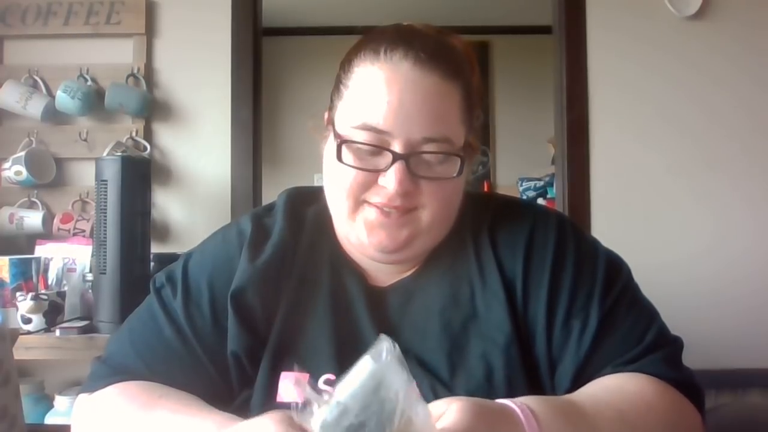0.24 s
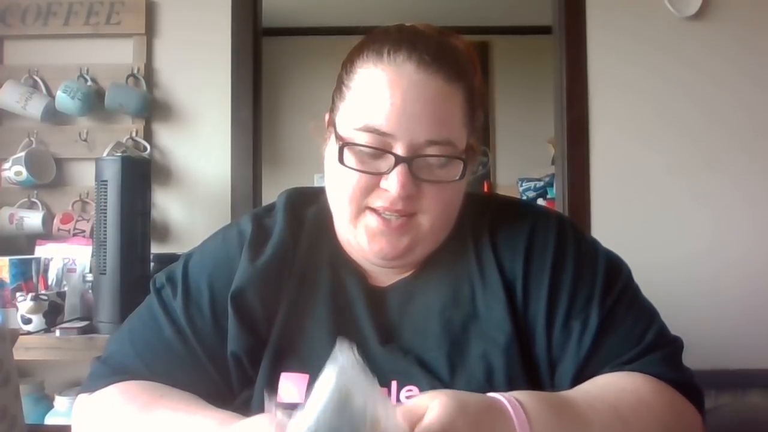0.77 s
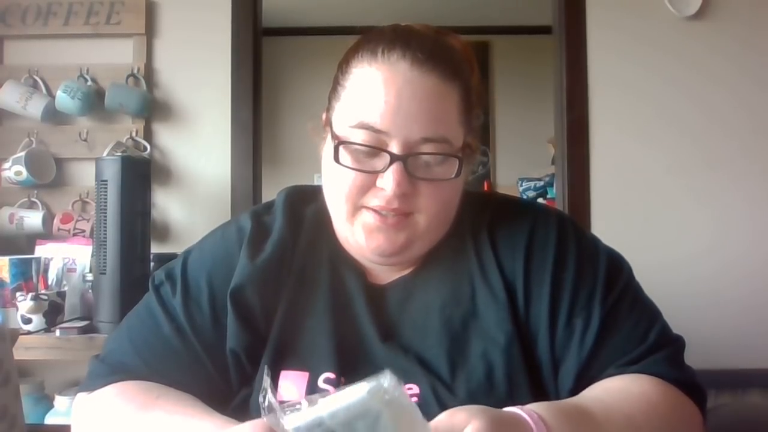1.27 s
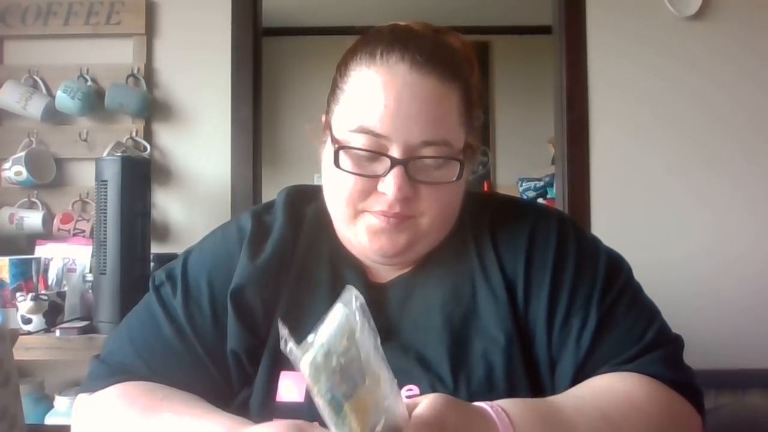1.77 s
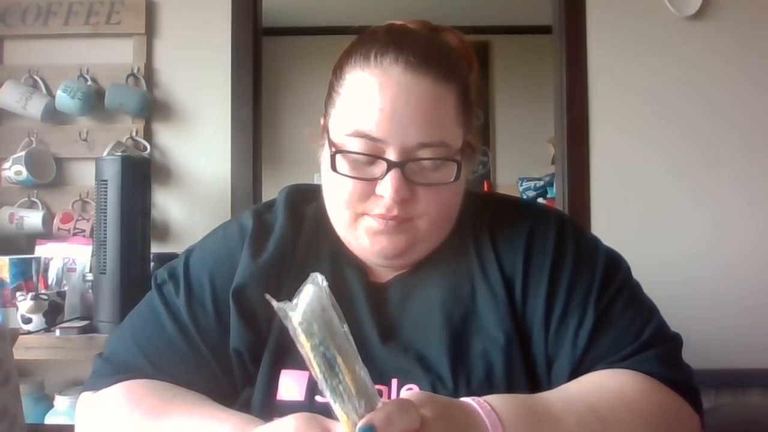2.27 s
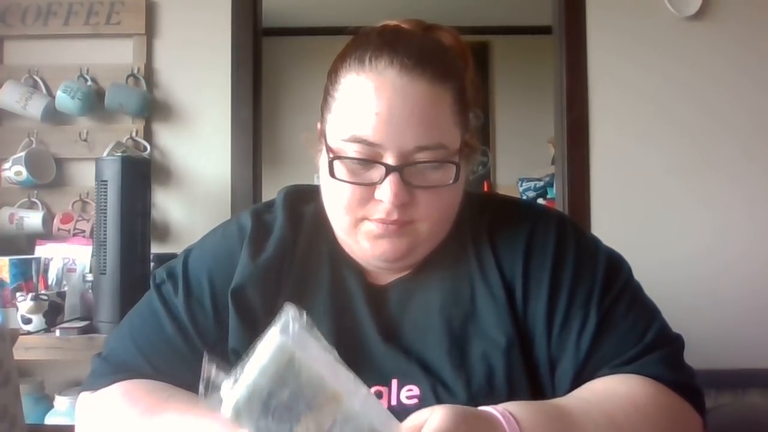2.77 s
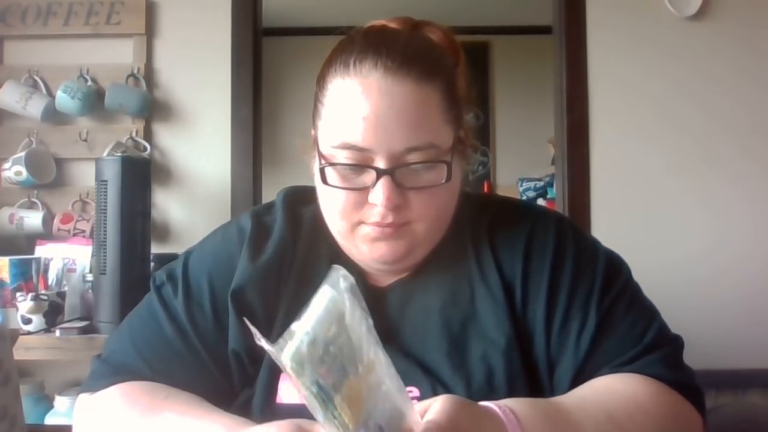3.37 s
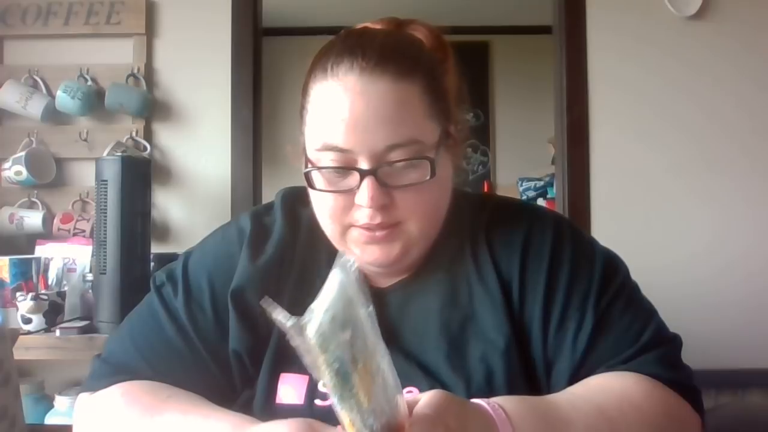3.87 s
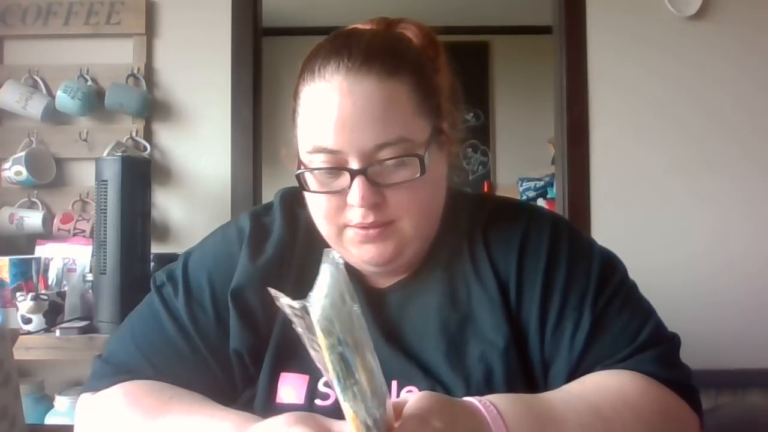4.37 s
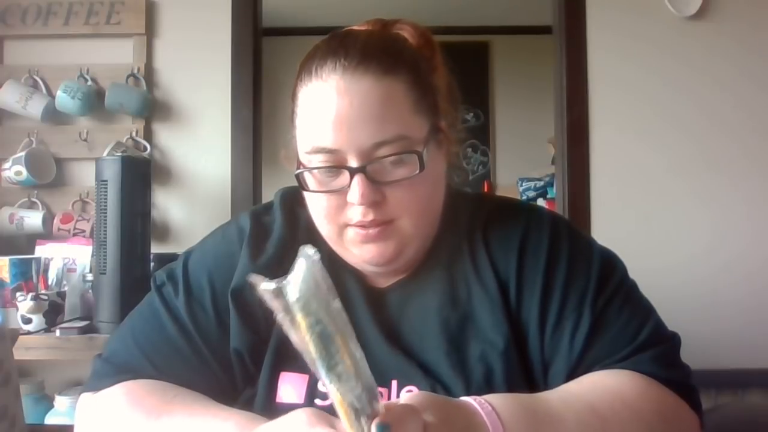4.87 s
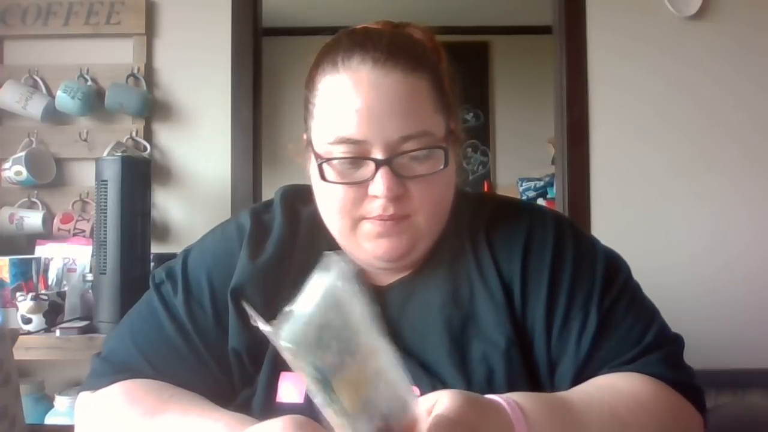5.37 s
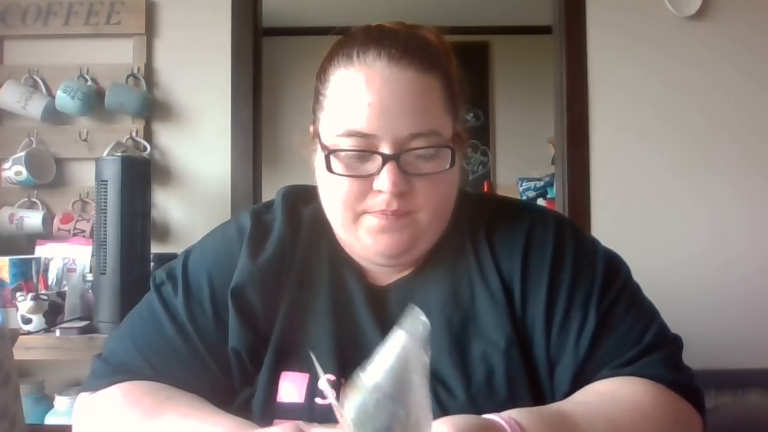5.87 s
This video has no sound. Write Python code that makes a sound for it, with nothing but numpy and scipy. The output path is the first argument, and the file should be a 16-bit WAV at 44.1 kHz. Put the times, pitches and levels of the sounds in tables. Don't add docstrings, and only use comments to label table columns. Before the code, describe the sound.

Close plastic crinkling, bright but narrow in band, as though through a laptop microphone with noise suppression. Sharp creases pop over fine crackle while the packet knocks dully underneath. Activity rises and falls: several early flurries, a strongest cluster around the middle, one isolated hard snap later, then fuller rustling to the end. Pauses drop almost to silence, with little room echo.

```python
import sys
import numpy as np
from scipy import signal
from scipy.fft import rfft, irfft, next_fast_len
from scipy.io import wavfile
from scipy.ndimage import uniform_filter1d

SR = 44100
rng = np.random.default_rng(int(sys.argv[2]) if len(sys.argv) > 2 else 0)


def magnitude_from_level(level_db):
    exponent = np.asarray(level_db, float) / 20
    return 10 ** exponent


def put_to_file(sound):
    columns = np.atleast_2d(sound).T
    safe = np.clip(columns, -1, 1)
    whole_steps = np.round(safe * 32767)
    wavfile.write(sys.argv[1], SR, whole_steps.astype(np.int16))


N = 270774


def at_hz(points, hz):
    points = np.array(points)
    return np.interp(np.log(hz + 1), np.log(points[:, 0]), points[:, 1])


def shape(x, gain):
    size = next_fast_len(len(x) + SR // 8)
    hz = np.arange(size // 2 + 1) * SR / size
    return irfft(rfft(x, size) * gain(hz), size)[:len(x)]


def resonance(x, hz, width_hz):
    r = np.exp(-np.pi * width_hz / SR)
    top = [(1 - r * r) / 2, 0, (r * r - 1) / 2]
    return signal.lfilter(top, [1, -2 * r * np.cos(2 * np.pi * hz / SR), r * r], x + 1e-18)


def rms_one(x):
    return x / np.sqrt(np.mean(x ** 2) + 1e-20)


def drift(rate):
    r = np.exp(-2 * np.pi * rate / SR)
    settled = signal.lfilter([1], [1, -2 * r, r * r], rng.standard_normal(N + SR))[SR:]
    return rms_one(settled)


# [pitch_hz, level_db per Hz]
FILM = [
    (100, -26.5),
    (300, -15.5),
    (700, -6),
    (1200, -2.5),
    (2500, 0),
    (4500, 0.5),
    (6500, 0.5),
    (9500, -12),
]


def film_colour(x):
    return shape(x, lambda hz: magnitude_from_level(at_hz(FILM, hz)))


def hiss():
    return magnitude_from_level(-78.5) * film_colour(rng.standard_normal(N))


# [pitch_hz, time to fall 60 dB in s]
ROOM = [
    (300, 0.087),
    (800, 0.13),
    (2000, 0.23),
    (5500, 0.028),
]


def room(x, places=7):
    t, edges_hz = np.arange(SR // 3) / SR, 100 * 2. ** np.arange(8)
    place = np.arange(N) / SR / 0.06
    out = 0
    for k in range(places):
        tail = 0
        for low, high in zip(edges_hz, edges_hz[1:]):
            octave = signal.butter(2, [low, high], "band", fs=SR, output="sos")
            band = signal.sosfilt(octave, rng.standard_normal(len(t)))
            tail = tail + band * magnitude_from_level(-60 * t / at_hz(ROOM, 1.0 * low))
        tail = tail * np.clip((t - 0.002) / 0.00038, 0, 1)
        here = np.sin(np.pi / 2 * np.clip((place - k) % places, 0, 2))
        out = out + signal.fftconvolve(x * here, tail / np.sqrt(np.sum(tail ** 2)))[:N]
    return out


SWAY_DB = 4
# [pitch_hz, width_hz, level_db]
PACKET = [
    (127, 65, -10),
    (229.5, 20, -8),
    (450.6, 107, 7),
    (617, 94, 6),
    (943, 120, -6.5),
]


def packet(pushes, sway_db):
    out = 0
    for (hz, width_hz, db), sway in zip(PACKET, sway_db):
        out = out + magnitude_from_level(db + sway) * resonance(pushes, hz, width_hz)
    return out


def flex(x):
    t = np.arange(SR // 40) / SR / 0.01
    swell = (t * np.exp(-3.0 * t)) ** 2
    power = signal.fftconvolve(x ** 2, swell / swell.sum())[:N]
    return rng.standard_normal(N) * np.sqrt(np.maximum(power, 0))


# [start_s, peak level_db, pitch_hz]
KNOCKS = [(0.159, -26.5, 714), (0.654, -38.5, 476), (0.961, -35.5, 670), (1.044, -38, 616),
          (1.116, -27.5, 620), (1.168, -27, 605), (1.454, -26.5, 623), (2.214, -37, 430),
          (2.912, -28.5, 590), (2.936, -27, 613), (2.99, -23, 620), (3.482, -41, 466), (3.518, -33, 630),
          (3.722, -32, 503), (3.76, -35, 800), (1.315, -31, 1450), (4.743, -37, 460), (3.957, -39, 460),
          (4.137, -40, 640), (4.275, -41.5, 626), (4.377, -35, 660), (4.48, -34, 600), (4.616, -42.5, 504),
          (4.877, -30, 630), (4.937, -28.5, 690), (5.18, -29.5, 630), (2.947, -23, 1050),
          (5.346, -31, 1110), (1.165, -35, 1290), (1.337, -33.5, 1530), (5.426, -22.5, 590),
          (5.458, -29, 443), (5.76, -37, 664), (5.973, -39.5, 656), (6.096, -31, 460)]
# [start_s, peak level_db, pitch_hz]
THUDS = [
    (2.715, -45.5, 167),
    (2.719, -43, 276),
    (5.437, -45, 215),
    (5.465, -42, 169),
    (5.611, -45.5, 246),
]
# [start_s, peak level_db, pitch_hz]
NUDGES = [(0.279, -48, 540), (0.385, -56, 686), (0.531, -37.5, 448), (0.723, -39.5, 625), (0.844, -37, 458),
          (1.006, -39, 694), (1.317, -43, 640), (1.386, -49, 610), (1.414, -38.5, 420), (1.536, -39, 656),
          (2.117, -54.5, 620), (2.452, -38.5, 440), (2.587, -46, 659), (2.62, -40.5, 624),
          (2.669, -39, 630), (2.836, -38, 426), (3.1, -38.5, 413), (3.183, -31, 390), (3.234, -29.5, 440),
          (3.543, -39.5, 640), (3.761, -36, 640), (4.545, -36.5, 420), (4.904, -31.5, 620),
          (5.049, -35, 630), (5.209, -34, 630), (5.268, -34.5, 640), (5.373, -39, 614), (5.398, -28, 620),
          (5.807, -35.5, 634), (3.731, -33, 525), (4.823, -37, 600), (5.485, -42.5, 494), (1.19, -38, 910)]


def knocks():
    out, t = np.zeros(N + 2000), np.arange(2000) / SR
    flexes = KNOCKS + THUDS + NUDGES
    for (s, db, hz), noise in zip(flexes, rng.standard_normal((len(flexes), 2000 + len(PACKET)))):
        push = noise[:2000] * (1 - np.exp(-t / 0.0028)) * np.exp(-t / 0.0032)
        bump = resonance(resonance(push, hz, 0.31 * hz + 50), hz, 0.22 * hz + 90)
        if 350 < hz < 1000:
            bump = bump + 0.31 * packet(push, SWAY_DB * noise[2000:])
        at = int(s * SR)
        out[at:at + 2000] += magnitude_from_level(db + 9) * bump / np.abs(bump).max()
    return out[:N]


# [hardest press start_s, crackle level_db, build_up_s, release_s]
SQUEEZES = [(0.018, -46.5, 0.6, 0.034), (0.191, -38, 0.18, 0.12), (.43, -54, 0.18, 0.14),
            (.54, -49.5, 0.15, 0.061), (.72, -55, 0.031, 0.89), (0.871, -43, 0.62, 0.12),
            (1.056, -38.5, 0.38, 0.53), (1.375, -42.5, 0.015, 0.19), (1.487, -37, 0.2, 0.038),
            (1.666, -47, 0.38, 0.11), (1.85, -47, 1, 0.12), (1.986, -41.5, 0.094, 0.029),
            (2.129, -50.5, 0.073, 0.017), (2.26, -56.5, 0.035, .1), (2.5, -47.5, 0.32, 0.16),
            (2.661, -37, 0.23, 0.13), (2.87, -42, 0.3, 0.079), (2.948, -25, 0.066, 0.087),
            (3.242, -36, 0.22, 0.12), (3.56, -47.5, 0.39, 0.32), (3.734, -45.5, 0.65, 0.13),
            (3.841, -55.5, .055, 0.082), (3.977, -45.5, 0.015, 0.15), (4.397, -49, 0.039, 0.12),
            (4.566, -46, 0.051, 0.25), (4.88, -48.5, 0.3, 0.45), (5.15, -40.5, 0.09, 0.89),
            (5.352, -30, 0.046, 0.23), (5.8, -38, 0.23, 0.19), (6.121, -40, 0.093, 0.19)]


def grip(t):
    s, db, build, release = np.transpose(SQUEEZES)[:, :, None]
    away = np.maximum((s - t) / build, (t - s) / release)
    fall_db, rest_db = 21.5, -98
    return 10 * np.log10(np.sum(magnitude_from_level(db - fall_db * away) ** 2, axis=0) + magnitude_from_level(rest_db) ** 2)


def crackle():
    sizes = magnitude_from_level(4.2 * np.minimum(rng.exponential(1, N), 3)) * rng.choice([-1, 1], N)
    born = rng.random(N) < 1700 * magnitude_from_level(5.5 * drift(40)) / SR
    slips = sizes * born
    facets_hz, dealt = np.geomspace(900, 8500, 20), rng.integers(0, 20, N)
    rings = 0
    for k, hz in enumerate(facets_hz):
        patch = magnitude_from_level(3.5 * drift(4.8))
        rings = rings + patch * resonance(slips * (dealt == k), hz, 0.081 * hz)
    coarse = np.arange(0, N, 40)
    db = np.interp(np.arange(N), coarse, grip(coarse / SR))
    return magnitude_from_level(db + 12.0) * rms_one(rings + 0.27 * slips)


# [start_s, peak level_db]
LESSER = [(0.042, -31.0), (0.0608, -33.5), (0.0692, -29.5), (0.0971, -21.0), (0.1286, -31),
          (0.1537, -29), (0.2245, -27.0), (0.3293, -28.0), (0.349, -32.5), (0.3981, -27.5),
          (0.4042, -32.0), (0.4113, -32.5), (0.438, -29.5), (0.4472, -29.0), (0.4593, -30.0),
          (0.4795, -31.5), (0.4832, -30.5), (0.49, -33.5), (0.5313, -31.5), (0.5462, -30.0),
          (0.5546, -31.5), (0.5768, -30.5), (0.6141, -30), (0.6228, -38.0), (0.6652, -31.0),
          (0.6996, -30.0), (0.7239, -31.0), (0.7521, -28.0), (0.792, -34.0), (0.7973, -31.0),
          (0.8692, -27.5), (0.872, -29.0), (0.9515, -27.0), (1.0228, -25.5), (1.1025, -24.5),
          (1.1434, -27.0), (1.233, -28.5), (1.2387, -23.0), (1.2793, -31.5), (1.2956, -29.5),
          (1.3892, -27.0), (1.5219, -26.0), (1.539, -26.0), (1.6188, -28.0), (1.6267, -28.5),
          (1.6366, -27.5), (1.6467, -28.5), (1.6888, -28.5), (1.698, -27.0), (1.7626, -28.5),
          (1.7762, -29.0), (1.8012, -32.0), (1.8154, -31.0), (1.8438, -29.0), (1.8697, -32.0),
          (1.9463, -33.5), (1.9822, -28.5), (1.9874, -26.5), (1.9952, -28.0), (2.0089, -35.5),
          (2.0927, -32.0), (2.0994, -34.0), (2.1317, -27.5), (2.2176, -26.5), (2.234, -33.5),
                 (2.2994, -36.0), (2.3054, -31.5), (2.3151, -38.5), (2.3555, -28.5), (2.3605, -30.5),
                 (2.3748, -30.0), (2.3858, -33.0), (2.3895, -27.0), (2.4058, -33.0), (2.4166, -32.0),
                 (2.4303, -28.0), (2.4534, -27.0), (2.4615, -31.5), (2.4679, -29.5), (2.5093, -26.5),
                 (2.5144, -28.0), (2.5378, -27.5), (2.6039, -27.5), (2.6261, -25.5), (2.6419, -26.0),
                 (2.6658, -24.0), (2.7074, -27.0), (2.776, -30.5), (2.7942, -26.5), (2.811, -26.5),
                 (2.835, -26.5), (2.8761, -24.5), (3.0683, -26.0), (3.0906, -31.5), (3.2222, -23.5),
                 (3.2603, -25.0), (3.2845, -26.5), (3.3703, -28.5), (3.3886, -30.0), (3.409, -26.0),
                 (3.4223, -27.5), (3.4568, -35.5), (3.4633, -32.5), (3.5012, -29.5), (3.5202, -27.0),
                 (3.545, -27.0), (3.5518, -27.5), (3.586, -29.0), (3.5999, -28.0), (3.6132, -28.5),
                 (3.6237, -32.5), (3.667, -27.5), (3.7314, -26.5), (3.8267, -30.0), (3.8361, -35.0),
                 (3.8502, -36.0), (3.92, -28.0), (3.9888, -29.0), (4.0109, -26.5), (4.015, -29.0),
          (4.0975, -28.5), (4.1387, -33), (4.1444, -34), (4.1889, -32.0), (4.237, -30),
               (4.2775, -29.5), (4.2871, -29.0), (4.3029, -32.5), (4.3101, -31.5), (4.3209, -34.0),
               (4.3381, -36.0), (4.3721, -35.5), (4.3791, -27.5), (4.3837, -26.5), (4.4029, -29.0),
               (4.4874, -30.5), (4.5107, -34), (4.5264, -33.5), (4.5564, -29.0), (4.6196, -32.5),
               (4.6317, -25.0), (4.701, -33.0), (4.7309, -31.0), (4.7384, -32.5), (4.7499, -31.0),
               (4.7586, -34.0), (4.7869, -31.0), (4.8006, -27.5), (4.8388, -30.5), (4.8926, -27.0),
               (4.9018, -26.5), (4.9656, -29.0), (4.976, -28.5), (5.0374, -28.0), (5.1018, -28.5),
               (5.1429, -28.0), (5.1581, -29.0), (5.1634, -28.0), (5.2507, -29.5), (5.2646, -26.5),
               (5.3192, -26.5), (5.4862, -28.0), (5.5258, -30.0), (5.5379, -30.5), (5.5438, -30.5),
               (5.5513, -31.5), (5.5921, -24.0), (5.5957, -27.5), (5.614, -32.5), (5.6317, -36.5),
               (5.6775, -26), (5.6925, -28.5), (5.7178, -26.5), (5.7441, -26.0), (5.7725, -23.5),
               (5.8067, -25.5), (5.9762, -26.5), (6.0185, -30), (6.0229, -28.0), (6.099, -21)]


def small_creases():
    rows = LESSER
    return [(s, db - 1.1, rng.uniform(2240, 6530)) for s, db in rows]


# [start_s, peak level_db, facet pitch_hz]
ROLLING = [(0.1337, -19.0, 4690.0), (0.1617, -10.5, 4180.0), (0.1661, -18.0, 4440.0),
           (0.1768, -28.0, 4440.0), (0.1879, -17.0, 2710.0), (0.1939, -15.5, 3320.0),
           (0.1996, -21.0, 6370.0), (0.2039, -20.0, 3920.0), (0.2099, -23.0, 6760.0),
           (0.2889, -25.0, 2410.0), (0.3861, -20.5, 6460.0), (0.5032, -23.0, 5040.0),
           (0.5212, -26.5, 4010.0), (0.7339, -27.5, 3400.0), (0.8082, -25.0, 4520.0),
           (0.8163, -24.5, 5170.0), (0.8363, -26.5, 1810.0), (0.8443, -25.5, 3100.0),
           (0.8857, -23.5, 4180.0), (0.9795, -22.0, 4050.0), (0.9976, -26.5, 5560.0),
           (1.0051, -25.5, 4260.0), (1.0179, -25.5, 4650.0), (1.0375, -19.0, 5210.0),
           (1.0426, -26.0, 5680.0), (1.0485, -15.5, 4780.0), (1.0654, -19.0, 4050.0),
           (1.0863, -16.0, 6290.0), (1.0914, -24.0, 4820.0), (1.1129, -27.0, 5730.0),
           (1.1345, -24.0, 5680.0), (1.1621, -20.5, 4820.0), (1.1696, -18.0, 1030.0),
           (1.1725, -19.5, 1810.0), (1.1918, -20.0, 4650.0), (1.1983, -25.5, 1810.0),
           (1.3095, -23.0, 6420.0), (1.3176, -14.5, 1420.0), (1.3267, -15.0, 3270.0),
           (1.3813, -20.5, 2840.0), (1.4238, -23.5, 5300.0), (1.4396, -22.0, 5680.0),
           (1.4546, -14.5, 5300.0), (1.4572, -13.0, 2760.0), (1.478, -19.5, 4650.0),
           (1.4817, -13.0, 3530.0), (1.4897, -23.5, 4130.0), (1.4949, -20.0, 4650.0),
           (1.5056, -22.0, 4610.0), (1.5311, -27.0, 3060.0), (1.5431, -25.5, 5340.0),
           (1.5618, -27.0, 5340.0), (1.6594, -19.0, 3140.0)]
# [start_s, peak level_db, facet pitch_hz]
FLIPPING = [(1.7095, -23.0, 2410.0), (1.861, -22.5, 5680.0), (1.9065, -23.0, 5080.0),
            (1.9558, -27.0, 4740.0), (2.0561, -26.0, 3700.0), (2.1178, -23.5, 2370.0),
            (2.2811, -27.0, 6200.0), (2.3973, -25.5, 6370.0), (2.421, -27.0, 3230.0),
            (2.4794, -25.0, 3830.0), (2.4857, -24.5, 5300.0), (2.5, -21.5, 4690.0), (2.5049, -25.5, 5430.0),
            (2.531, -26.5, 4690.0), (2.5523, -25.0, 2410.0), (2.569, -20.5, 4610.0),
            (2.5757, -26.0, 4180.0), (2.5821, -25.0, 4130.0), (2.6098, -21.0, 4050.0),
            (2.6508, -22.5, 6630.0), (2.6696, -23.5, 6550.0), (2.6772, -26.0, 3960.0),
            (2.6946, -24.5, 5510.0), (2.7841, -20.5, 5510.0), (2.8081, -29.0, 5000.0),
            (2.8301, -20.0, 5560.0), (2.8647, -17.0, 5560.0), (2.8831, -21.0, 1810.0),
            (2.9105, -17.5, 3100.0), (2.9154, -20.5, 4220.0), (2.9183, -9.0, 3400.0),
            (2.9292, -14.5, 4910.0), (2.9318, -15.0, 3100.0), (2.9383, -11.0, 2710.0),
            (2.9429, -17.0, 3230.0), (2.948, -9.0, 4130.0), (2.9549, -15.5, 2970.0),
            (2.9614, -14.0, 6030.0), (2.9786, -20.5, 6590.0), (2.9843, -21.5, 3570.0),
            (2.9928, -17.0, 2540.0), (3.1256, -26.5, 2200.0), (3.1398, -20.0, 6890.0),
            (3.1635, -15.5, 4650.0), (3.1673, -28.0, 6290.0), (3.1849, -17.0, 2540.0),
            (3.1957, -20.5, 4780.0), (3.1983, -16.0, 5560.0), (3.2112, -23.5, 5470.0),
            (3.2451, -17.5, 4130.0), (3.2654, -24.5, 5080.0), (3.2738, -24.0, 2540.0)]
# [start_s, peak level_db, facet pitch_hz]
PICKING = [(3.315, -21.5, 5640.0), (3.4319, -26.0, 3700.0), (3.4857, -21.0, 4650.0), (3.516, -24.5, 4650.0),
           (3.5477, -25.5, 4910.0), (3.5666, -26.5, 3270.0), (3.5725, -26.5, 5380.0),
           (3.6462, -27.0, 5470.0), (3.6599, -24.5, 3140.0), (3.7174, -18.0, 4610.0),
           (3.7235, -18.0, 6420.0), (3.9308, -28.5, 5300.0), (3.9565, -24.5, 2630.0),
           (4.0869, -25.0, 5000.0), (4.4829, -29.5, 4610.0), (4.5482, -10.0, 5040.0),
           (4.5659, -22.0, 5080.0)]
# [start_s, peak level_db, facet pitch_hz]
PULLING = [(4.7441, -25.5, 6370.0), (4.7789, -23.0, 5380.0), (4.8139, -26.0, 3400.0),
           (4.8258, -25.0, 3920.0), (4.8742, -22.0, 5250.0), (4.8813, -19.5, 4610.0),
           (4.9055, -22.0, 4130.0), (4.938, -25.0, 3360.0), (4.9423, -24.0, 6550.0),
           (4.9897, -24.5, 6760.0), (5.0328, -26.0, 5300.0), (5.0514, -27.0, 3700.0),
           (5.0557, -22.5, 6720.0), (5.1132, -16.5, 4870.0), (5.1207, -24.5, 5430.0),
           (5.1344, -23.5, 5470.0), (5.1826, -24.0, 5170.0), (5.1988, -24.5, 4480.0),
           (5.209, -22.5, 4390.0), (5.2184, -25.5, 5900.0), (5.2256, -20.5, 4870.0),
           (5.2707, -23.5, 4870.0), (5.2787, -22.0, 3570.0), (5.29, -20.0, 4570.0), (5.3083, -26.0, 2580.0),
           (5.3347, -20.5, 5300.0), (5.342, -18.5, 5380.0), (5.3487, -16.0, 4740.0),
           (5.3512, -19.5, 1250.0), (5.3583, -24.0, 5300.0), (5.3776, -19.0, 1770.0),
           (5.3874, -23.0, 3270.0), (5.398, -17.5, 2800.0), (5.4028, -21.5, 4950.0),
           (5.4089, -24.5, 6160.0), (5.4292, -19.5, 2500.0), (5.4588, -28.5, 3230.0),
           (5.466, -22.5, 2930.0), (5.5651, -26.0, 4870.0), (5.686, -15.0, 6160.0), (5.705, -26.0, 3140.0),
           (5.7327, -18.0, 5040.0), (5.7497, -23.0, 3790.0), (5.7629, -16.5, 4520.0),
           (5.7677, -23.0, 5340.0), (5.7795, -25.5, 7020.0), (5.7917, -22.5, 4220.0),
           (5.8108, -21.0, 5300.0), (5.8238, -27.0, 6850.0), (5.8397, -20.0, 4010.0),
           (5.8446, -22.0, 1770.0), (5.8509, -18.0, 5170.0), (6.0358, -22.5, 6200.0),
           (6.0388, -23.0, 2330.0), (6.0575, -22.5, 5510.0), (6.0814, -25.5, 5470.0),
           (6.1018, -16.0, 4050.0), (6.1312, -26.0, 6330.0)]


def snaps():
    film, spread = np.zeros(N + 900), np.zeros(N + 900)
    t = np.arange(600) / SR - 0.003
    creases = ROLLING + FLIPPING + PICKING + PULLING + small_creases()
    chance = rng.standard_normal((len(creases), 605))
    for (s, db, hz), (long, slow, sharp, other, share, *noise) in zip(creases, chance):
        fall_s, rise_s = 0.0009 * magnitude_from_level(3.0 * long), 0.0002 * magnitude_from_level(4.0 * slow)
        burst = np.exp(np.minimum(t / rise_s, -t / fall_s))
        skirt = 0.14 * np.exp(np.minimum(3.5 * t, -t) / 0.004)
        volley = np.array(noise) * (burst + skirt)
        volley[np.argmax(t >= 0)] += 2.28 * np.sign(other)

        bright = min(hz / 2600, 1)
        ring = resonance(volley, hz, (0.14 * hz + 150) * magnitude_from_level(3.2 * sharp))
        next_hz = np.clip(3000 * magnitude_from_level(3.5 * other), 1200, 7000)
        ring = ring + magnitude_from_level(-7.0 + 2.2 * share) * resonance(volley, next_hz, 0.23 * next_hz)
        thin = signal.lfilter(*signal.butter(2, 0.24 * hz, "high", fs=SR), volley)
        snap = 0.62 * magnitude_from_level(-2.5 * sharp) * bright * thin + 1.7 * ring

        power = uniform_filter1d(snap ** 2, size=60)
        gain = magnitude_from_level(db + 5.5) / np.sqrt(power.max())
        at = max(int((s + 0.001) * SR) - power.argmax(), 0)
        film[at:at + 600] += gain * snap
        spread[at:at + 600] += gain * (1.006 * bright * volley + 0.59 * ring)
    return film[:N], spread[:N]


def scene():
    (snap, spread), fine = snaps(), crackle()
    sway_db = [SWAY_DB * drift(15) for mode in PACKET]
    pushes = magnitude_from_level(-11.5) * flex(spread) + magnitude_from_level(-2.5) * fine
    body = packet(pushes, sway_db) + knocks()
    near = film_colour(snap + fine) + body
    reflected = magnitude_from_level(-13) * room(film_colour(spread + fine) + body)
    return (near + reflected + hiss())[None]


# [start_s, end_s, treble level_db, bass level_db]
SHUT = [(0.068, 0.128, -10, -53), (0.35, 0.377, -6, -12), (0.57, 0.62, -13.5, -28), (0.904, 0.953, -3, -13),
        (1.362, 1.38, 7.5, -41), (1.729, 1.763, -4, -26), (2.025, 2.105, -0.5, -44),
        (2.189, 2.215, -19, -14), (2.31, 2.358, -8.5, -15), (3.684, 3.719, -4.5, -29),
        (3.772, 3.828, -8.5, -9), (3.862, 3.916, -22, -21), (4.032, 4.083, -12.5, -32),
        (4.15, 4.183, -9, -10), (4.203, 4.228, -27, -22), (4.222, 4.275, -25, -7), (4.425, 4.474, -17, -32),
        (4.637, 4.7, -17.5, -35), (5.64, 5.69, -15.5, -17), (5.914, 5.975, -11, -19),
        (0.621, 0.647, -19, -12), (0.664, 0.691, -4.5, -5), (1.231, 1.278, -5.5, -14.5),
        (3.33, 3.367, -7.5, -6), (5.692, 5.759, -2, -12.5), (5.992, 6.02, -8, -6),
        (5.886, 5.921, -2, -10.5), (4.584, 4.62, -6.5, -23), (1.083, 1.132, 2.5, -7.5)]


def suppress(x, split_hz=1300):
    t, treble_db, bass_db = np.arange(N) / SR, np.zeros(N), np.zeros(N)
    for start, end, treble, bass in SHUT:
        closed = np.clip((t - start) / 0.02, 0, 1) * np.clip((end - t) / 0.0043, 0, 1)
        treble_db, bass_db = treble_db + treble * closed, bass_db + bass * closed
    low = shape(x, lambda hz: 1 / (1 + (hz / split_hz) ** 8))
    return magnitude_from_level(bass_db) * low + magnitude_from_level(treble_db) * (x - low)


# [pitch_hz, level_db]
MICROPHONE = [
    (3710, -9.5),
    (6300, -9),
    (7140, -8),
    (8950, -27.5),
    (11600, -72),
    (19700, -120),
]


def band_edge(x):
    return shape(x, lambda hz: magnitude_from_level(at_hz(MICROPHONE, hz)) * (1 - np.exp(-((hz - 8000) / 45) ** 2)))


def band_limit(x):
    return signal.sosfilt(signal.butter(12, 9100, fs=SR, output="sos"), x)


def record(dry):
    rumble = magnitude_from_level(-75 + 3.8 * drift(7.2)) * rms_one(resonance(rng.standard_normal(N), 110, 160))
    x = suppress(dry[0]) + rumble
    x = signal.sosfilt(signal.cheby2(6, 21, 105, "high", fs=SR, output="sos"), x)
    residue = magnitude_from_level(-104) * rng.standard_normal(N)
    mix = (band_edge(x) + residue)[None]
    return band_limit(mix)


dry = scene()
out = record(dry)
put_to_file(out)
```